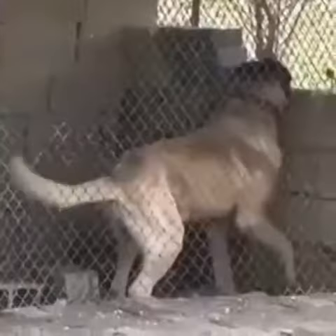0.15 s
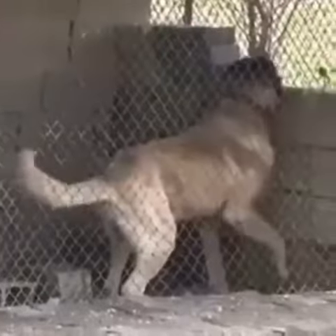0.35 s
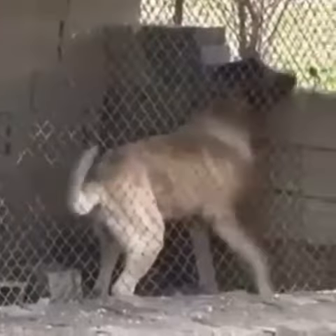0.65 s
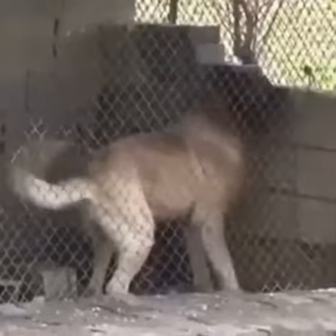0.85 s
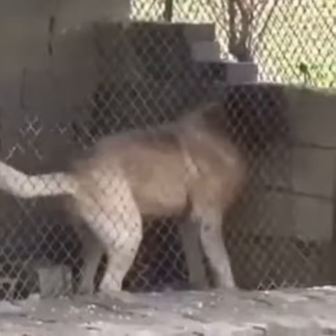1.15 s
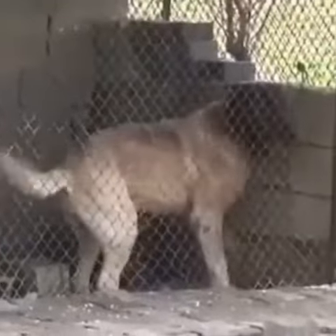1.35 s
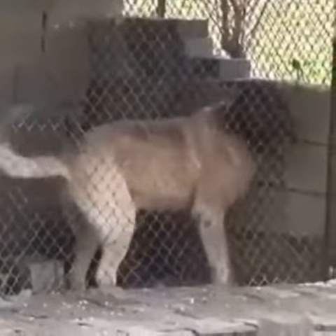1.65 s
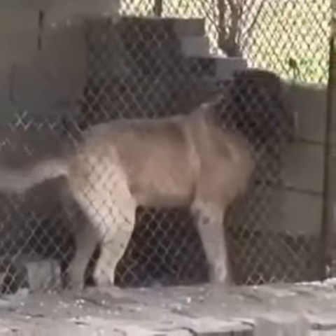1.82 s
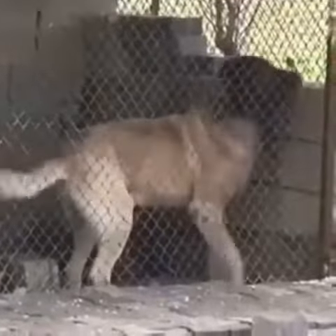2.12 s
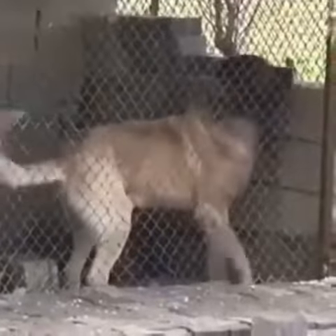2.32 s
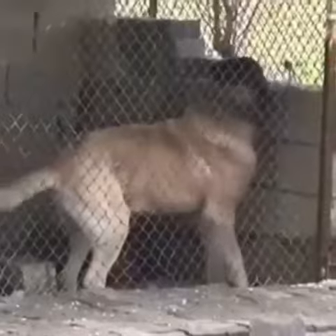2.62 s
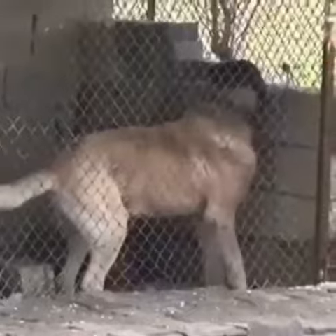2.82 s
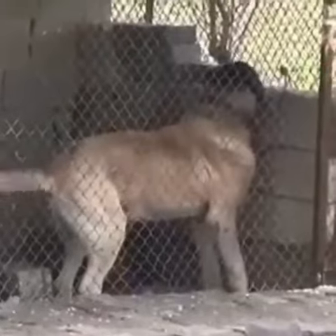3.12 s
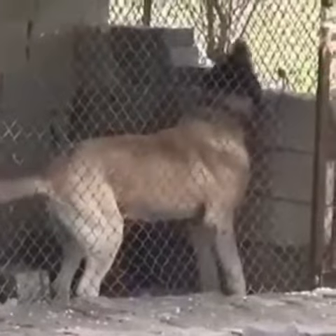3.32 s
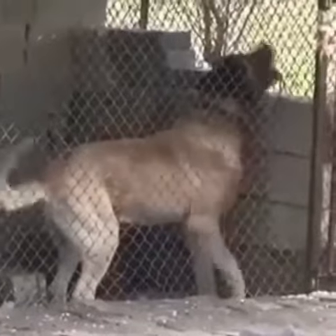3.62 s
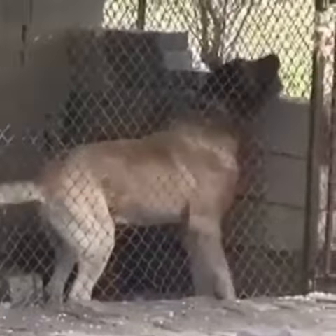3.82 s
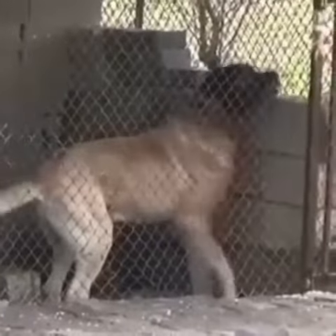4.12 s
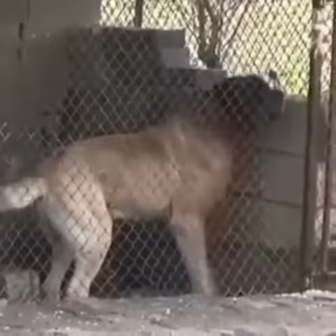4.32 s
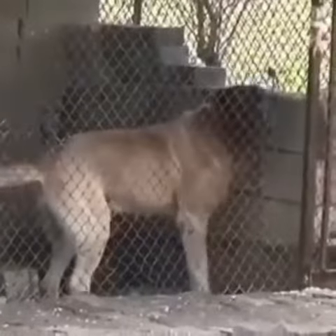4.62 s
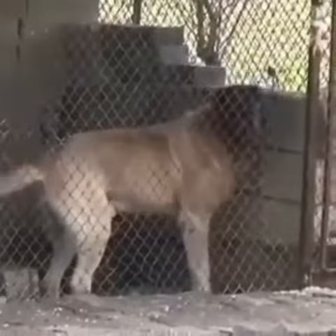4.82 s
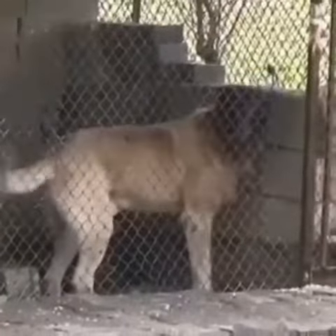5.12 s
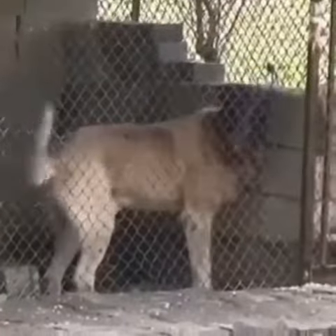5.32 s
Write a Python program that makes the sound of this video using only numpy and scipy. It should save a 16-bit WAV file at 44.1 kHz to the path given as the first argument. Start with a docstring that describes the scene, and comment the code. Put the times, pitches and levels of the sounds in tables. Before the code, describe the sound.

After a soft hollow thump and some scuffing of paws, a big dog starts barking in a walled outdoor yard. The deep, raspy barks come a little under a second apart, with high whines in between. In the second half a long two-toned whine rises and falls through the barking. A wire fence ticks and rustles quietly, and the microphone picks up reflections from the walls.

```python
"""A large dog barks eight times in a walled yard behind a wire fence. Its vocal folds and turbulent
breath excite the throat: a strong chest tone with a hoarse, period-tripled rasp. Thin whistling
whines slip between the barks and grow into a long two-voiced whine. A hollow boom dies away at first,
paws scuff, the wire ticks and rustles, and the walls reflect it all over faint outdoor air."""
import sys
import numpy as np
from scipy import signal
from scipy.fft import rfft, irfft, next_fast_len
from scipy.io import wavfile
from scipy.ndimage import uniform_filter1d, minimum_filter1d, map_coordinates

SR = 44100
rng = np.random.default_rng(int(sys.argv[2]) if len(sys.argv) > 2 else 0)


def output_pcm(signal):
    """Save a mono or channel-first signal as 16-bit PCM at the path in sys.argv[1].

    Samples are clipped to [-1, 1] before scaling.
    """
    pcm = np.clip(np.atleast_2d(signal).T, -1, 1) * 32767
    wavfile.write(sys.argv[1], SR, np.round(pcm).astype(np.int16))


N = 240697

# pitch of the high voice in the long whine: (time [s], frequency [Hz])
LONG_WHINE_PITCH = [(3.7, 815), (3.75, 745), (3.81, 785), (3.895, 1155), (3.955, 1172), (4.0, 1116),
                    (4.075, 845), (4.135, 885), (4.24, 1155), (4.28, 1138), (4.36, 1020), (4.53, 1035),
                    (4.64, 1112), (4.88, 1105), (4.94, 1030), (5.09, 995), (5.26, 865), (5.31, 765),
                    (5.41, 722)]


def dog():
    """Superposition of one animal's calls: barks, whines, moans and squeaks."""
    # (time [s], attack [s], hold [s], release [dB/s], pitch [Hz], glide [Hz/s], chest [dB], throat [dB],
    #  mouth [dB], hiss [dB], chest swell [dB/s], brightness fade [dB/s], first hoarseness [0-1],
    #  last hoarseness [0-1], jaw open [s], formant rise [ratio], hollowness [dB], mouth band top [Hz])
    barks = [(0.794, 0.065, 0.063, 400, 344.6, -130, -19, -26, -41.5, -55, 1, -27, 0.63, 0.95, .072, 1.01, 2.5, 1640),
             (1.538, .056, 0.088, 385, 351.1, 54, -21, -23, -40.5, -53.5, -19, -5, 0.28, 0.47, 0.096, 1.15, 2, 1810),
             (2.215, 0.061, 0.077, 400, 371.3, -26.5, -20.5, -26, -33, -50, -16, 2, 0.46, 0.42, 0.085, 1.34, 6.5, 1703),
             (2.985, 0.084, 0.059, 500, 359.6, 42, -23, -24, -38.5, -54.5, 19.5, 51.5, 0.56, 0.39, 0.15, 1.005, 5.5, 1720),
             (3.51, 0.092, .068, 347, 318.4, 888.5, -24, -27, -37, -57.5, 37, -35, 0.22, 0.06, 0.72, 1.18, 3.5, 2160),
             (3.803, .043, 0.0788, 291, 349.3, 242, -21.5, -26, -41, -54, -62.5, -14.5, .8, .8, .072, 1.0, -1, 1820),
             (4.591, 0.055, 0.089, 407, 349.3, -140, -24, -24, -36.5, -52.5, -2, 20, 0.49, 0.25, 0.062, 1.01, 2.5, 1670),
             (5.155, .075, 0.064, 389, 345.7, -150, -20, -27.5, -44, -55, 114, 90.5, 0.86, 0.11, 0.085, 1.22, -4.5, 1700)]
    # pitch of the two short whines: (time [s], frequency [Hz])
    first_whine = [(0.602, 956), (.68, 970), (.74, 1185), (.79, 1293), (0.828, 1365), (.88, 1350)]
    second_whine = [(1.059, 894), (1.109, 860), (1.152, 750), (1.185, 710), (1.221, 710), (1.297, 840)]
    # quiet nasal level of each whine: (fundamental [dB], octave [dB], overtones before strain [dB])
    nasal_levels = [(-75, -66, -78), (-60, -76, -65.5), (-52.5, -57.5, -67)]
    # low moans and high squeaks: (time [s], length [s], first pitch [Hz], last pitch [Hz], level [dB])
    moans = [(3.644, 0.07, 788, 746, -24), (3.877, 0.1894, 775, 739, -31), (4.207, 0.15, 781, 729, -43.5),
             (4.522, .12, 788, 780, -48.5), (4.735, 0.21, 781, 794, -26.5)]
    squeaks = [(1.265, 0.042, 3260, 3800, -57), (1.295, 0.048, 3240, 2830, -57.5),
               (1.328, 0.19, 4160, 4570, -65), (1.425, 0.064, 2024, 3130, -52),
               (2.067, 0.17, 2100, 2860, -59.5), (2.488, 0.049, 3070, 2600, -71),
               (5.411, 0.098, 2130, 2310, -51.5)]
    voice = np.zeros(N)
    for row in barks:
        add(voice, *bark(row))
    for points, nasal_db in zip((first_whine, second_whine, LONG_WHINE_PITCH), nasal_levels):
        add(voice, *whistle(points, nasal_db))
    for row in moans:
        add(voice, *moan(*row))
    for row in squeaks:
        add(voice, *squeak(*row))
    return voice


def bark(row, onset_db=36, chest_lag_s=0.0042, arch_hz_per_s2=1504, jitter=0.046, tripling=0.96):
    """Source-filter voicing: vocal fold pulses and pulsed turbulence excite the throat's resonances."""
    # air rushing past the teeth: (frequency [Hz], relative spectral level [dB])
    teeth = [(1500, -12.5), (2050, -4), (2240, 9), (2600, -4), (3100, -6), (3650, -4), (3950, -4),
             (4450, 3), (5100, -13.5), (8000, -14.5), (10300, -10.5), (13000, -14)]
    (start, attack, hold, release, mid_hz, slope, chest_db, throat_db, mouth_db, hiss_db,
     swell, fade, first_hoarse, last_hoarse, jaw_s, formant_rise, hollow_db, mouth_top_hz) = row
    t, gate = span(start, attack + hold + .12)
    n, age = len(t), t - start

    def effort(age):
        """Level in dB of the push of breath behind every layer: rounded attack, hold, steady release."""
        rise_db = -onset_db * np.maximum(1 - age / attack, 0) ** 2
        return rise_db - release * np.maximum(age - attack - hold, 0)

    shudder = lambda: 2.87 * wobble(66.5, n)  # unsteady breath, in dB
    from_middle = np.minimum(age, attack + hold) - attack - hold / 2
    bright_db = effort(age) - fade * from_middle
    turn = -hold / 2 - attack / 3  # the pitch turns late in the attack, then glides
    gliding = turn + np.abs(from_middle - turn)
    pitch = mid_hz + slope * gliding - arch_hz_per_s2 * gliding ** 2
    hoarse = np.clip(np.interp(age, [attack / 2, attack + hold], [first_hoarse, last_hoarse]), 0, 1)
    phase = cycles(pitch * (1 + jitter * np.sqrt(hoarse) * wobble(128.3, n)))
    # strained folds repeat only about every third cycle, which puts lines between the harmonics
    triple = phase / 3 + wobble(43.9, n)
    beat = 1 + hoarse * (2 * tripling * np.cos(triple) + .5 * wobble(200, n))
    pulses = unit(beat * sum(np.cos(k * phase) for k in np.arange(1, 8)))
    turbulence = noise(n) * (1 + 0.043 * np.cos(phase))
    opening = 1 / (1 + (age / jaw_s) ** 4)  # the jaw starts wide, then narrows
    voiced = vocal_tract(pulses, opening, formant_rise, hollow_db)
    breathy = vocal_tract(turbulence, opening, formant_rise, hollow_db)

    def register(low_hz, high_hz, share):
        """One band of the voice, with a share of its power turbulent."""
        tone, rush = unit(band(voiced, low_hz, high_hz)), unit(band(breathy, low_hz, high_hz))
        return steady(np.sqrt(1 - share) * tone + np.sqrt(share) * rush)

    # the chest tone stays nearly pure, with a noisy undertone at two thirds of the pitch
    rasp = unit(band(np.sin(2 * phase / 3 + wobble(22.6, n)) + 10 * noise(n), 247.3, 423))
    slack = 1 / (1 + np.exp((pitch - 358) / 8))  # tight folds at high pitch lose the undertone
    chest_gain = amp(chest_db + effort(age - chest_lag_s) + swell * from_middle + shudder())
    chest = chest_gain * steady(np.cos(phase) + 1.08 * hoarse * slack * rasp)
    throat = amp(throat_db + bright_db + shudder()) * register(390, 1020, hoarse / 2)
    mouth = amp(mouth_db + bright_db + shudder()) * register(1160, mouth_top_hz, hoarse)
    # the hiss follows the effort, but more gently, and sputters
    hiss = amp(hiss_db + 0.66 * bright_db + 3 * wobble(72.4, n)) * coloured(turbulence, teeth)
    return start, gate * (chest + throat + mouth + hiss)


def vocal_tract(x, opening, formant_rise, hollow_db, hollow_hz=670, hollow_width_hz=110):
    """Formant filtering: the throat's resonances lie higher while the jaw is open."""
    # throat resonances: (frequency [Hz], bandwidth [Hz], gain [dB])
    formants = [(312, 83.6, 5), (643.6, 41, 10), (804, 43, -1.5), (963, 200, -3), (1391, 287, -10),
                (1585, 290, -14)]

    def response(hz):
        """Second-order resonators, shaped by the back of the mouth, which rounded lips bring out."""
        throat = sum((-1) ** k * amp(db) * 1j * hz * width / (centre ** 2 - hz ** 2 + 1j * hz * width)
                     for k, (centre, width, db) in enumerate(formants))
        return throat * amp(hollow_db / (1 + ((hz - hollow_hz) / hollow_width_hz) ** 2))

    wide_open = filtered(x, lambda hz: response(hz / formant_rise))
    return (1 - opening) * filtered(x, response) + opening * wide_open


def whistle(points, nasal_db, flutter=.006, patchy_db=5, strain_db_per_octave=16.5, easy_hz=1047):
    """A nearly pure whine with an octave; nasal resonance shapes overtones that grow with pitch."""
    # the whine breaks out through the mouth:
    # (time [s], length [s], fundamental [dB], octave [dB], overtones before strain [dB])
    surges = [(0.73, 0.039, -32.5, -40, -58.5), (0.755, 0.057, -35.5, -55, -67),
              (1.072, 0.047, -75, -79, -58), (1.197, 0.065, -49.5, -65, -56.5),
              (3.678, 0.14, -38.5, -51, -81), (3.88, 0.12, -23, -38.5, -64),
              (4.134, 0.017, -69, -31, -81.5), (4.211, 0.11, -32.5, -51, -60),
              (4.647, 0.34, -44, -82.5, -68), (5.1, .11, -44.5, -41, -60.5), (5.195, 0.16, -31, -62.5, -60)]
    # response of the nasal passage: (frequency [Hz], gain [dB])
    nose = [(2200, -12.5), (2900, 4), (3500, 3.5), (4500, 0), (5500, -11.5), (7500, -11), (12000, -19.5)]
    t, gate = span(points[0][0], points[-1][0] - points[0][0])
    n, pitch = len(t), glide(t, points)
    oral = sum(amp(db)[:, None] * surge(t, start, length) for start, length, *db in surges)
    first, octave, upper = amp(nasal_db)[:, None] + oral
    phase = cycles(pitch * (1 + flutter * wobble(92, n)))
    overtones = sum(amp(along(nose, k * pitch) + patchy_db * wobble(25, n)) * np.sin(k * phase)
                    for k in np.arange(3, 10))
    breath = 0.54 * unit(band(noise(n), 3000, 16000, order=2))  # air in the narrow passage
    treble = unit(unit(overtones) + breath)
    tone = np.sqrt(2) * (first * np.sin(phase) + octave * amp(2 * wobble(30, n)) * np.sin(2 * phase))
    strain_db = strain_db_per_octave * np.log2(pitch / easy_hz) + 2 * wobble(29.8, n)
    return t[0], gate * amp(wobble(60, n)) * (tone + upper * amp(strain_db) * treble)


def moan(start, length, first_hz, last_hz, db):
    """Biphonation: the folds sing below the whistle, and coupling gives combination tones."""
    t, _ = span(start, length)
    low = cycles(np.linspace(first_hz, last_hz, len(t)) * (1 + 0.0083 * wobble(110, len(t))))
    high = cycles(glide(t, LONG_WHINE_PITCH))
    tone = np.sin(low) + amp(-27) * np.sin(2 * low)
    combination = amp(-28) * np.sin(low + high) + amp(-24) * np.sin(2 * high - low)
    return start, surge(t, start, length) * np.sqrt(2) * amp(db) * (tone + combination)


def squeak(start, length, first_hz, last_hz, db):
    """A whistled linear chirp with a weak second harmonic swells and fades."""
    n = int(length * SR)
    phase = cycles(np.linspace(first_hz, last_hz, n) * (1 + 0.013 * wobble(180, n)))
    tone = np.sin(phase) + amp(-19) * np.sin(2 * phase)
    return start, np.sqrt(2) * amp(db) * np.hanning(n) * tone


def boom():
    """Free decay of three low modes: a hollow boom at the start."""
    # (frequency [Hz], level [dB], 60 dB decay time [s])
    modes = [(120, -31, 0.71), (217, -26, 0.18), (312, -70, 0.25)]
    track, t = np.zeros(N), np.arange(SR) / SR
    for hz, db, t60 in modes:
        add(track, 0, amp(db - 60 * t / t60) * np.sin(2 * np.pi * hz * t))
    return track


def rubbing():
    """Friction noise: paws scuff the ground, and the wire mesh rustles where it is brushed."""
    # paw and mesh contacts: (time [s], level [dB], Gaussian width [s])
    scuffs = [(-0.006, -33.5, 0.025), (0.089, -43.5, 0.028), (0.303, -56, 0.11), (0.377, -43.5, 0.018),
              (0.45, -55.5, 0.024), (0.633, -51.5, 0.021),]
    rustles = [(1.9, -74, 0.064), (2.55, -75.5, .1), (4.25, -71, 0.55)]
    # scuffed ground: (frequency [Hz], relative spectral level [dB])
    ground = [(35, -16), (60, -11), (190, -4), (290, 1.5), (500, -19), (934, -19.5), (1250, -21.5),
              (1840, -30.5), (4410, -31.5), (5500, -42.5), (13000, -44)]
    grit = lambda: rng.standard_normal(N) * amp(3.1 * wobble(400, N))
    paws = swells(scuffs) * coloured(grit(), ground)
    mesh = swells(rustles) * unit(band(grit(), 1700, 13000, order=2))
    return paws + mesh


def fence(tick_t60=.009, clack_t60=.03):
    """Damped transients of the wire: each is a bright tick and a lower, longer clack."""
    # (time [s], tick level [dB], clack level [dB])
    ticks = [(0.0813, -50, -50), (0.3538, -78, -57), (0.9347, -44, -45), (1.181, -67, -48.5),
             (1.893, -52.5, -71), (1.9449, -51, -79), (2.674, -60, -74), (4.052, -57, -58),
             (4.159, -58, -70), (4.266, -56, -47), (4.378, -49, -48.5), (4.4941, -37, -64.5)]
    track, t = np.zeros(N), np.arange(SR) / SR
    for start, tick_db, clack_db in ticks:
        tick = amp(tick_db - 60 * t / tick_t60) * unit(band(noise(SR), 2400, 13000, order=4))
        clack = amp(clack_db - 60 * t / clack_t60) * unit(band(noise(SR), 1600, 2300, order=4))
        add(track, start, tick + clack)
    return track


def near_wall(x, t60=.28):
    """Scattering from the wall beside the dog adds a short, bright tail."""
    t = np.arange(SR // 2) / SR
    tail = band(noise(len(t)), 1900, 6000, order=4) * amp(-60 * t / t60)
    return signal.fftconvolve(x, tail / np.linalg.norm(tail))[:N]


def yard(x, delay_s=0.0063):
    """Reverberation between the walls, longest near the chest tone; two paths swell and fade in turn."""
    # (frequency [Hz], reverberation time [s])
    decay_times = [(120, 0.2), (350, 1.34), (700, 0.76), (1400, 0.89), (4000, 1.1), (12000, 0.54)]
    hz, t, spectra = signal.stft(rng.standard_normal((2, SR)), SR, nperseg=512)
    decay = amp(-60 * t / along(decay_times, hz)[:, None])
    tails = signal.istft(spectra * decay, SR, nperseg=512)[1]
    delayed = np.pad(x, (int(delay_s * SR), 0))[None]
    one, other = signal.fftconvolve(delayed, tails / np.linalg.norm(tails[0]), axes=1)[:, :N]
    turn = 1.1 * wobble(45, N)
    return np.cos(turn) * one + np.sin(turn) * other


def air(rumble_top_hz=130):
    """Ambient noise: faint outdoor rumble and hiss under slow amplitude modulation."""
    # (frequency [Hz], relative spectral level [dB])
    spectrum = [(25, -5), (42, -7.5), (62, -10.5), (105, -0.5), (150, -14), (380, -20), (750, -24),
                (1450, -28), (2400, -43), (13000, -49.5)]
    # course of the lowest rumble: (time [s], gain [dB])
    rumble_gains = [(0, -2.5), (1.5, 2.5), (3.499, -1.5), (5.4, -7.5)]
    ambient = coloured(rng.standard_normal(N), spectrum)
    rumble = band(ambient, 0.9, rumble_top_hz, order=4)
    rumble_db = np.interp(np.arange(N) / SR, *np.transpose(rumble_gains))
    return amp(-53 + 2.7 * wobble(4.9, N)) * (ambient - rumble + amp(rumble_db) * rumble)


def span(start, length):
    """Sample times of one call and a soft gate over it."""
    t = start + np.arange(int(length * SR)) / SR
    return t, np.clip(np.minimum((t - t[0]) / .008, (t[-1] - t) / .025), 0, 1)


def glide(t, points):
    """A smoothed pitch contour through (time [s], frequency [Hz]) points."""
    return uniform_filter1d(np.interp(t, *np.transpose(points)), size=800)


def surge(t, start, length, edge_s=0.035):
    """An envelope of at most 1 with a soft rise and fall."""
    ramp = np.clip(np.minimum(t - start, start + length - t) / edge_s, 0, 1)
    return np.sin(np.pi / 2 * ramp) ** 1.62


def swells(rows):
    """A sum of Gaussian envelopes, one per (time [s], level [dB], width [s]) row."""
    t = np.arange(N) / SR
    return sum(amp(db) * np.exp(-.5 * ((t - centre) / width) ** 2) for centre, db, width in rows)


def amp(db):
    """Decibels to amplitude ratio."""
    return 10 ** (np.asarray(db) / 20)


def unit(x):
    """x normalised to rms 1."""
    return x / np.sqrt(np.mean(x ** 2) + 1e-20)


def steady(x, window_s=0.015):
    """x with its short-time rms held at 1."""
    power = uniform_filter1d(uniform_filter1d(x ** 2, int(window_s * SR)), int(window_s * SR / 2))
    return x / np.sqrt(np.abs(power) + 1e-12)


def along(points, hz):
    """Interpolation of (frequency [Hz], value) points on a log frequency axis."""
    frequencies, values = np.transpose(points)
    return np.interp(np.log(hz + 1), np.log(frequencies + 1), values)


def add(track, start, x):
    """Superpose x on the track at a time in seconds."""
    part = track[max(round(start * SR), 0):][:len(x)]
    part += x[:len(part)]


def wobble(rate, n):
    """Smooth random modulation, rate knots a second."""
    return map_coordinates(rng.standard_normal(4096), [np.arange(n) * rate / SR], mode="wrap")


def noise(n):
    """n samples of white noise, two seconds at most."""
    return rng.standard_normal(2 * SR)[:n]


def cycles(hz):
    """Phase in radians, the integral of frequency."""
    return 2 * np.pi * np.cumsum(hz) / SR


def filtered(x, response):
    """Linear filtering: the spectrum of x times a frequency response."""
    size = next_fast_len(len(x) + 8192)
    return irfft(rfft(x, size) * response(np.fft.rfftfreq(size, 1 / SR)), size)[:len(x)]


def coloured(x, spectrum):
    """x shaped by (frequency [Hz], level [dB]) points, at rms 1."""
    return unit(filtered(x, lambda hz: amp(along(spectrum, hz))))


def band(x, low_hz, high_hz, order=12):
    """Zero-phase band-pass."""
    return filtered(x, lambda hz: 1 / (1 + (low_hz / (hz + 1)) ** order) / (1 + (hz / high_hz) ** order))


def scene():
    """Direct sound, its reflections and the ambient noise add in one channel."""
    direct = dog() + boom() + rubbing() + fence()
    return (direct + amp(-22.0) * yard(direct) + amp(-15.5) * near_wall(direct) + air())[None]


def record(dry, ceiling=.31, top_hz=13150):
    """Fast peak limiting holds the barks down; a sharp low-pass limits the bandwidth."""
    x = dry[0]
    needed = np.minimum(1, ceiling / (np.abs(x) + 1e-9))
    gain = uniform_filter1d(minimum_filter1d(needed, size=200), size=200)
    return filtered(x * gain, lambda hz: hz < top_hz)[None]


dry = scene()
out = record(dry)
output_pcm(out)
```